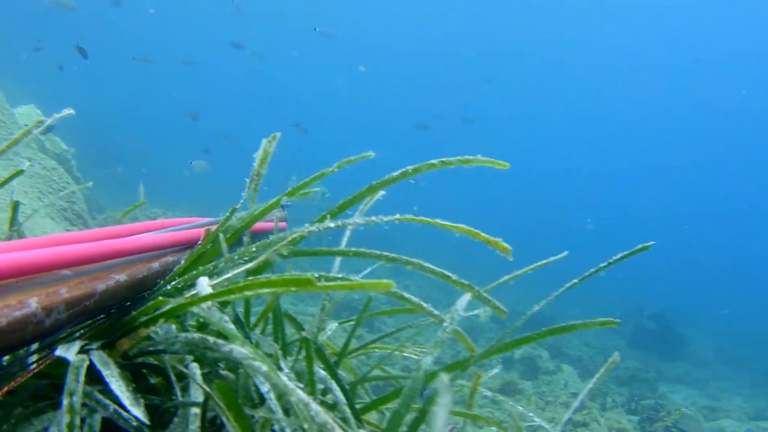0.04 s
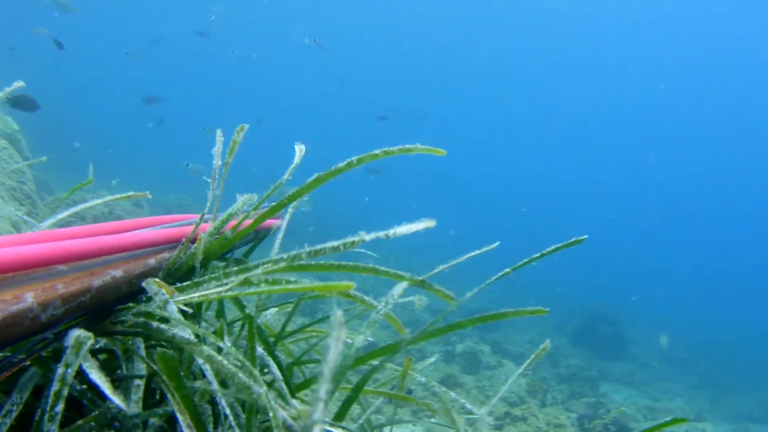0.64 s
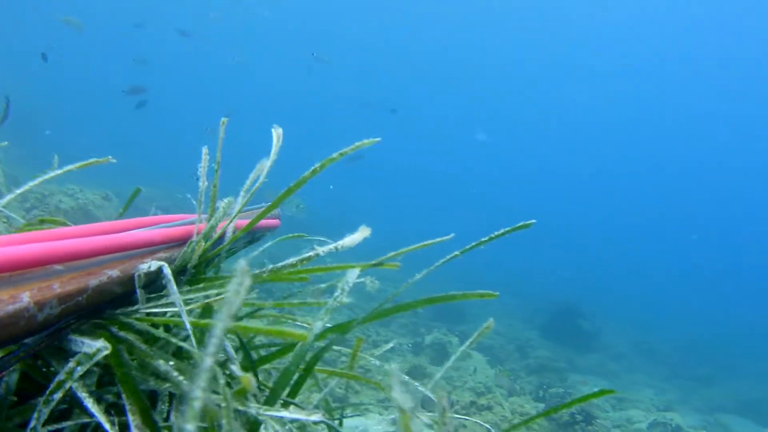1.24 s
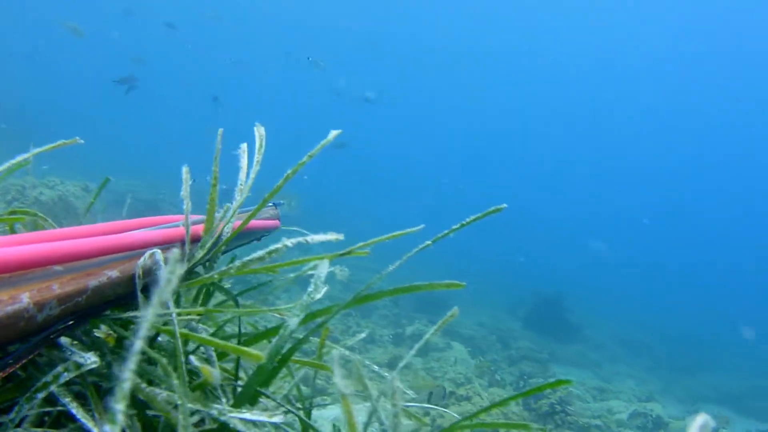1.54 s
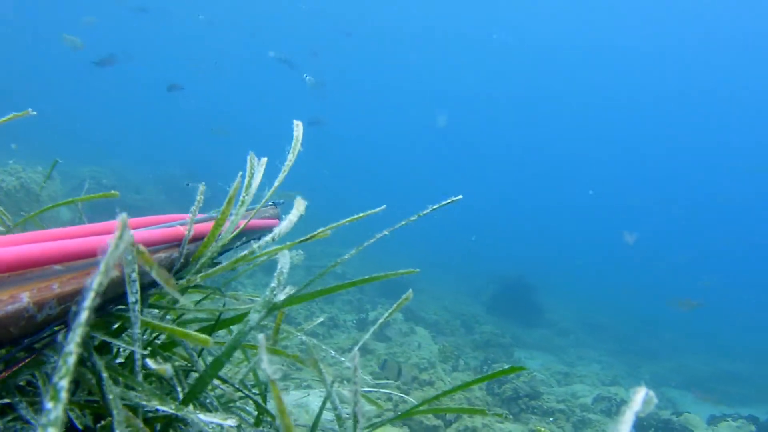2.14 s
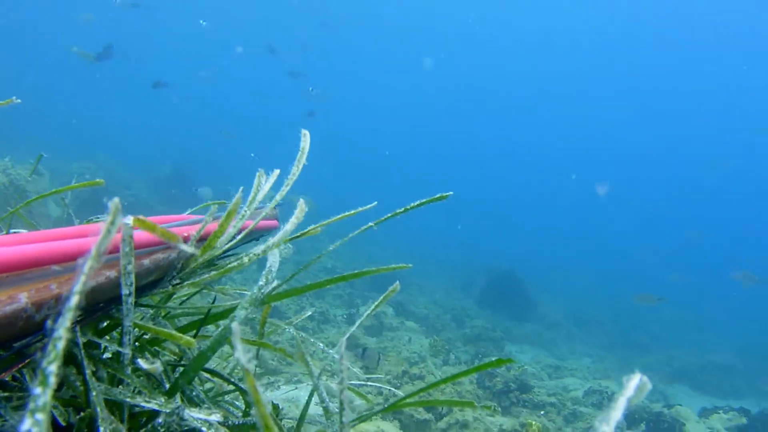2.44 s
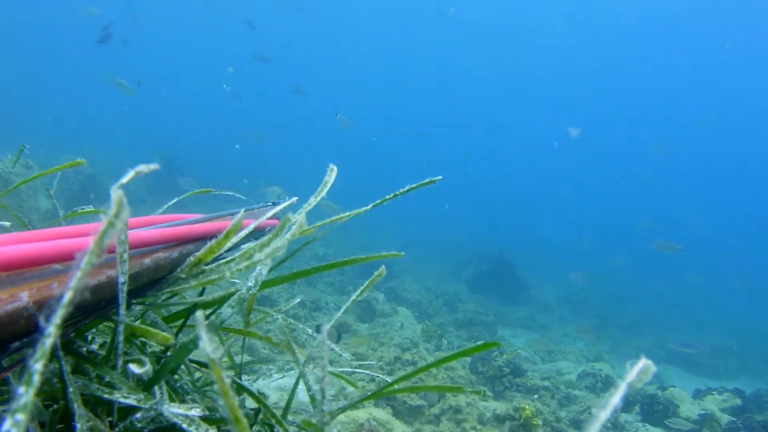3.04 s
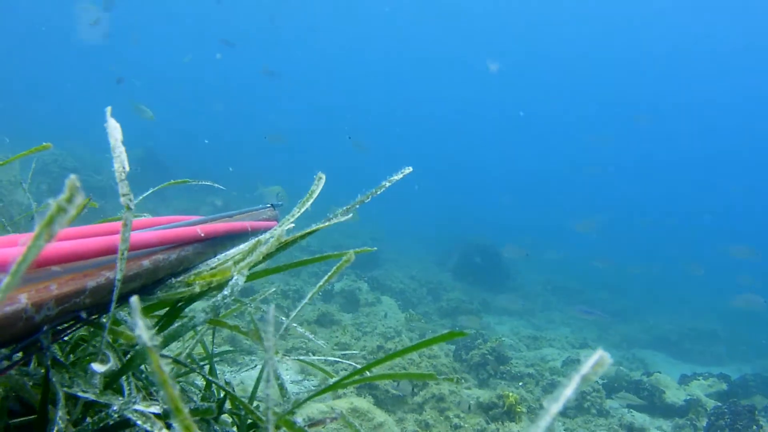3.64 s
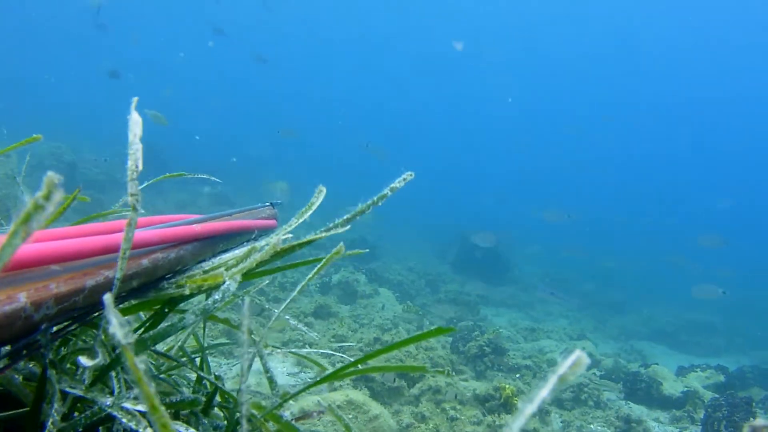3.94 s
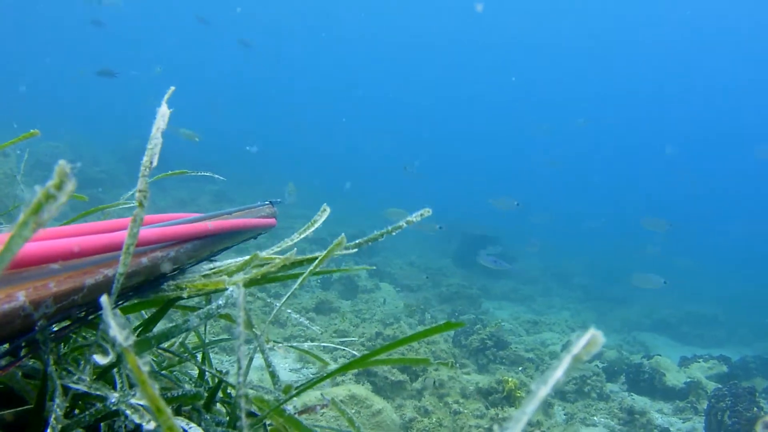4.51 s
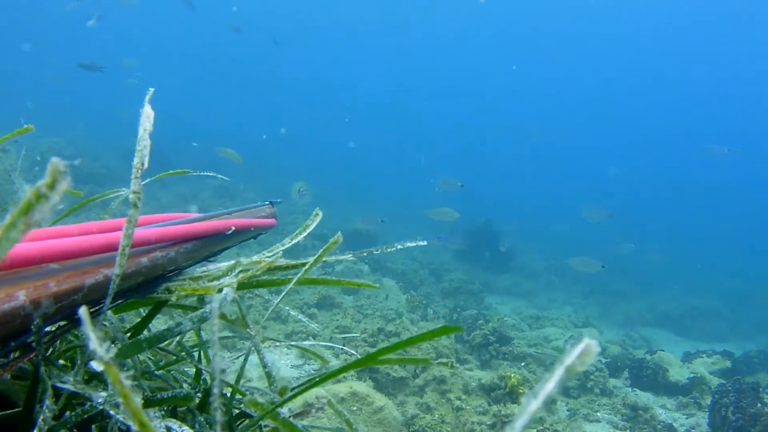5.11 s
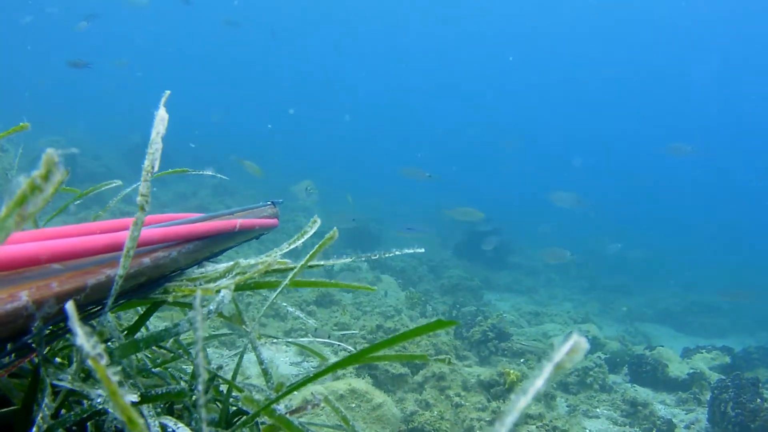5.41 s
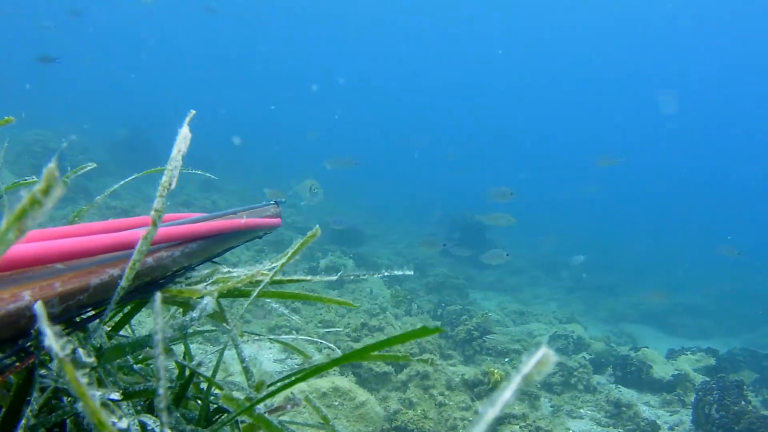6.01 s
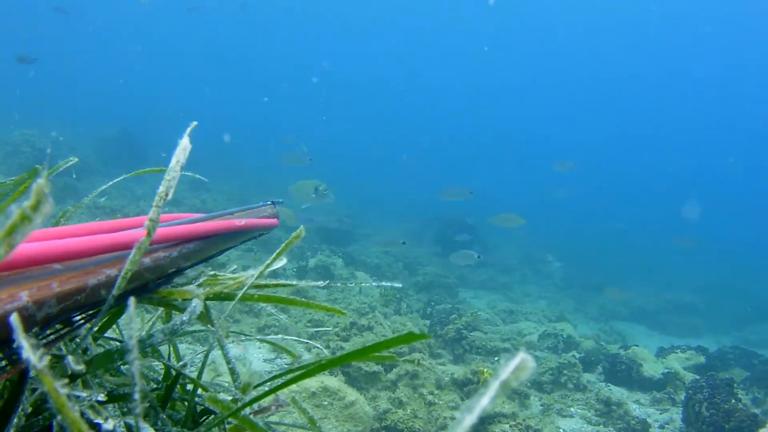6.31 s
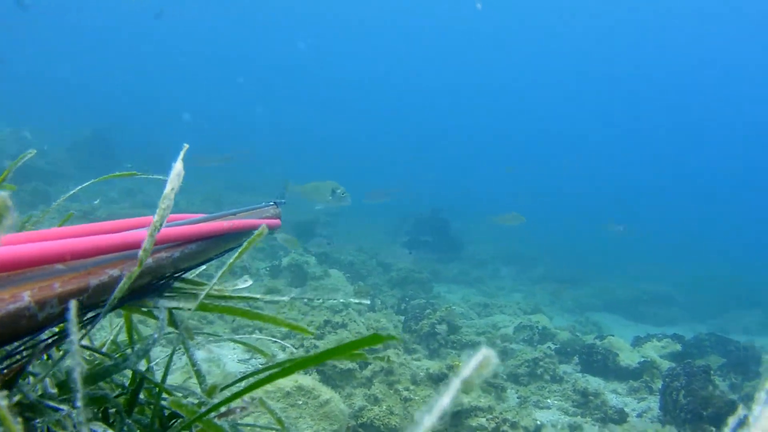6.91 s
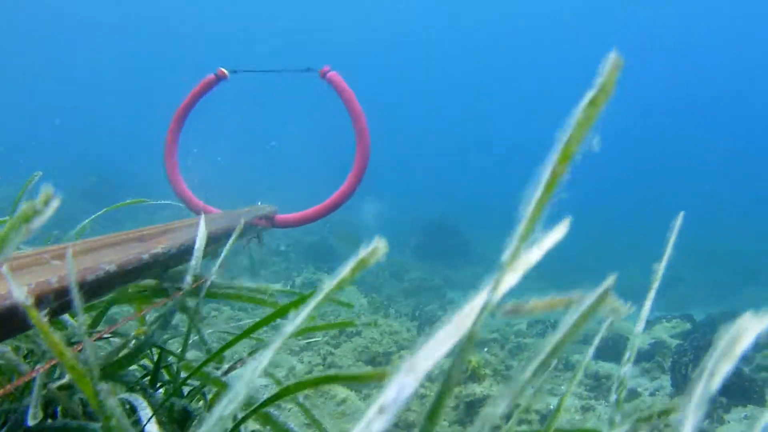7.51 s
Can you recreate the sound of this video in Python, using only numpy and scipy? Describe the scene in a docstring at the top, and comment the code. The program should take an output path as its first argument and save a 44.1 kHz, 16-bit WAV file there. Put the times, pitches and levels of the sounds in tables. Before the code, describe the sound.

From the start, a quiet, dull underwater wash holds steady, with the faint crackle of distant snapping shrimp. Closer shrimp make sharp, dry clicks at irregular intervals, several a second, each ringing slightly in the microphone's sealed housing. Stronger snaps stand out at about 0.2, 2.7, 3.7 and 4.5 seconds.

At about 7.0 seconds, a band-powered speargun fires right beside the microphone. It is by far the loudest sound: a hard, cracking thud with a tight cluster of slaps and knocks, overloading into a brief gritty crackle. A deep surge of churned water comes with the recoil. From about 7.1 seconds there are a few bright ticks and a quickly fading rattle from the bands and shaft. Softer knocks and a light line rattle follow between 7.2 and 7.5 seconds, dying down into the wash and shrimp clicks by about 7.7 seconds.

```python
"""Snapping shrimp click over a low sea wash; at 7 s a speargun fires with a loud, clattering thud.
The gun is band-powered, under water, right beside a microphone in a sealed housing.
Each shrimp snap rings the housing wall. Release and slapping bands ring the gun and overload
the microphone; the recoil shoves water, then wishbone, shaft and line rattle out."""
import sys
import numpy as np
from scipy import signal
from scipy.fft import rfft, irfft, next_fast_len
from scipy.io import wavfile

SR = 44100
rng = np.random.default_rng(int(sys.argv[2]) if len(sys.argv) > 2 else 0)


def store_pcm(level_fs):
    """Save levels as 16-bit WAV."""
    pcm = np.round(np.clip(level_fs, -1, 1) * 32767).astype(np.int16)
    wavfile.write(sys.argv[1], SR, np.atleast_2d(pcm).T)


N = 341775
TIME = np.arange(N) / SR
AGE = np.arange(16384) / SR  # s since an event's onset

# spectrum of a blow on the gun: f/Hz, level/dB
GUN_COLOUR = [(50, -8.5), (120, -7.5), (160, 0), (200, -0.5), (250, 0), (330, -2), (460, 1), (560, 0),
              (690, -1.5), (920, -3.5), (1550, -7.5), (2150, -18), (3100, -18), (3500, -40.5), (15000, -29)]
# gun resonances: f/Hz, level/dB, t60/s
GUN_MODES = [(237, -2.5, 0.095), (434.6, -11, 0.16), (495.5, 0.5, 0.071), (650, -6, .12), (699, -3, 0.062),
             (732, -7, .08), (838, -4.5, 0.1), (914, -8.5, .09), (1185, -12, 0.11), (1303, -17, .09),
             (1520, 0.5, 0.056), (1754, -16, 0.062), (1930, -10, 0.046), (2525, -16, .035),
             (2990, -4, 0.065)]


def undb(db):
    """Decibels to gain."""
    return 10 ** (np.asarray(db) / 20)


def level(x, db):
    """Set the rms level."""
    return x * undb(db) / np.sqrt(np.mean(x ** 2))


def unit(x):
    """Scale to unit energy."""
    return x / np.sqrt(np.sum(x ** 2))


def add(out, t_s, sound):
    """Mix a sound in at t_s."""
    i = int(t_s * SR)
    out[i:i + len(sound)] += sound[:N - i]


def envelope(t_s, db, rise_db_per_s, hold_s, fall_db_per_s):
    """Rise to full level at t_s, hold, die away."""
    before_s = np.maximum(t_s - TIME, 0)
    after_s = np.maximum(TIME - t_s - hold_s, 0)
    return undb(db - rise_db_per_s * before_s - fall_db_per_s * after_s)


def colour(x, points):
    """Minimum-phase filter through (f/Hz, level/dB) points."""
    n = 2 * next_fast_len(len(x))
    hz, db = np.transpose(points)
    bins_hz = np.maximum(np.arange(n // 2 + 1) * SR / n, 1)
    gain = undb(np.interp(np.log(bins_hz), np.log(hz), db))
    cepstrum = irfft(np.log(gain))
    cepstrum[1:n // 2] *= 2
    cepstrum[n // 2 + 1:] = 0
    return irfft(rfft(x, n) * np.exp(rfft(cepstrum)))[:len(x)]


def band(x, low_hz, high_hz):
    """Band-pass with second-order slopes."""
    highpass = signal.butter(2, low_hz, "high", fs=SR, output="sos")
    lowpass = signal.butter(2, high_hz, "low", fs=SR, output="sos")
    return signal.sosfilt(np.vstack([highpass, lowpass]), x)


def ring(force, modes):
    """A force rings damped modes."""
    response = sum(undb(db - 60 * AGE / t60_s) * np.cos(2 * np.pi * hz * AGE) for hz, db, t60_s in modes)
    return signal.fftconvolve(force, response)[:len(force)]


def burst(window):
    """Windowed random force, unit energy."""
    return unit(rng.standard_normal(len(window)) * window)


def crack(length_s):
    """Brief contact: a random force, spectrally flattened."""
    window = np.exp(-(AGE / length_s) ** 4)
    spectrum = rfft(burst(window))
    flat = irfft(spectrum / (np.abs(spectrum) + 1e-12))
    return unit(flat * np.sqrt(window))


def clicks(per_s, spread_db):
    """Random impulses: many weak, a few strong."""
    size = undb(spread_db * np.minimum(rng.exponential(size=N), 5))
    return (rng.random(N) < per_s / SR) * size * rng.choice([-1, 1], N)


def sea(db=-54, swell_db=.5):
    """Dull, even wash that swells very slightly."""
    # wash spectrum: f/Hz, level/dB
    wash_colour = [(12, -42), (20, -4), (95, -2), (365, -3), (482, -5), (819, -8.5), (916, -10),
                   (1280, -16), (1510, -16.5), (2180, -22.5), (3220, -26), (4140, -31.5), (4630, -27),
                   (5470, -32), (15800, -38.5)]
    steps_s = np.arange(0, 8, .25)
    swell = np.interp(TIME, steps_s, rng.standard_normal(len(steps_s)))
    return level(colour(rng.standard_normal(N), wash_colour), db) * undb(swell_db * swell)


def far_shrimp(db=-73, smear_s=.005):
    """The distant colony: faint, smeared crackle."""
    # crackle spectrum: f/Hz, level/dB
    crackle_colour = [(1000, -21), (1600, 7), (4600, 0), (8000, -8), (15000, -17)]
    pops = clicks(per_s=120, spread_db=2.6)
    crackle = signal.fftconvolve(pops, burst(np.exp(-AGE / smear_s)))[:N]
    return level(colour(crackle, crackle_colour), db)


def snap(db, brightness_db, hollow_hz, hollow_db=-3):
    """A click through water: crack, bounce, shiver of the housing wall, scatter off the seabed."""
    # snap through the wall: f/Hz, level/dB
    body_colour = [(900, -26), (1400, -4.5), (1900, 7.5), (2400, 7), (3200, 6), (3900, -1.5), (4650, 7),
                   (5700, -6.5), (6500, 4), (7300, -24), (12000, -36)]
    # its treble fizz: f/Hz, level/dB
    fizz_colour = [(4000, -37), (6500, 1), (8300, 15.5), (10000, 9), (13000, 8), (16000, -17)]
    # housing resonances: f/Hz, level/dB, t60/s
    housing_modes = [(1490, 1.5, 0.049), (1520, 5, 0.021), (1770, -1, 0.038)]
    crack_s, max_lag_s, shiver_s, seabed_s, hollow_t60_s = .0013, .003, .0033, .012, .0045
    direct = crack(crack_s)
    bounce = np.roll(direct, int(max_lag_s * rng.uniform(.5, 1) * SR))
    onset = 1 - np.exp(-AGE / crack_s)
    tail = burst(onset * (np.exp(-AGE / shiver_s) + undb(-15) * np.exp(-AGE / seabed_s)))
    late = undb(-5) * bounce + undb(-2.5) * tail
    force = direct + late
    body = unit(colour(force, body_colour))
    # each direction of arrival favours another broad wall resonance
    hollow = undb(hollow_db) * unit(ring(body, [(hollow_hz, 0, hollow_t60_s)]))
    # brighter: more fizz, less housing ring
    fizz = undb(-15 + .55 * brightness_db) * unit(colour(direct + .5 * late, fizz_colour))
    drive = band(force, low_hz=1300, high_hz=3870)
    housing = undb(-3 - brightness_db) * unit(ring(drive, housing_modes))
    return (unit(body + hollow) + fizz + housing) * undb(db) * np.sqrt(crack_s * SR)


def weak_snaps(count=55):
    """Shrimp at middle distance, random in time, strength and colour."""
    out = np.zeros(N)
    times_s = rng.uniform(0, TIME[-1], count)
    for t_s, (size, bright, pitch) in zip(times_s, rng.standard_normal((count, 3))):
        click = snap(db=-58.5 + 2 * size, brightness_db=5 + 6 * bright, hollow_hz=3200 * 2 ** (pitch / 2))
        add(out, t_s, click)
    return out


def near_snaps():
    """Sharp clicks close by: shrimp, then ticks of the departing shaft."""
    # clicks: t/s, level/dB, brightness/dB, hollow f/Hz, hollow level/dB
    events = [(.0709, -41.5, -6.5, 4550, -14), (.2056, -34.5, 3, 3100, -2), (.3519, -42.5, -8, 1950, 6),
              (.5767, -56, -12, 3240, 2), (.6033, -47.5, 7, 3160, -10), (.6286, -52, 14, 3360, -6),
              (.6538, -48, 13, 4640, -6), (.8098, -50, 8, 2310, -15), (1.0719, -43.5, 7, 5400, -2),
              (1.1018, -48, -2, 3250, -13), (1.2976, -49, -8, 2330, -6), (1.3782, -47, -14.5, 4400, -5),
              (1.4216, -52, 5, 5220, 11), (1.4806, -44, -1, 2430, -16), (1.5176, -50, 6, 4640, 0),
              (2.1994, -49.5, 6, 4580, -15), (2.2596, -50.5, -3, 2410, -12), (2.2993, -46, 9, 4700, -8),
              (2.354, -40.5, -4, 2320, 8), (2.366, -49, 4, 4600, -8), (2.5976, -47, 2, 2800, 10),
              (2.7142, -33.5, -1.5, 3000, -12), (2.7759, -44.5, 3, 5330, 5), (3.1, -46, -3, 2470, -2),
              (3.1567, -43, 5, 3300, -8), (3.4532, -48.5, -4, 2330, -4), (3.7076, -34, 0, 3400, -8),
              (3.9106, -38, -5, 2220, 20), (4.2928, -49, -6, 4450, -15), (4.4838, -49.5, -4, 4800, -2),
              (4.5041, -35, 0, 2500, 6), (4.7843, -41, 15, 5400, 6), (4.9792, -46.5, 1, 3030, -10),
              (5.0498, -46, 1, 2410, 4), (5.1774, -45, 10, 2470, -20), (5.3824, -39.5, -6, 2350, 1),
              (5.4064, -45, 16, 4620, -2), (6.0604, -47.5, 0, 3040, -10), (6.0886, -45, 0, 2450, -11),
              (6.1597, -44.5, 11, 2470, -25), (6.3056, -47, -6, 2320, 6), (6.8419, -49, 1, 2460, -18),
              (6.9124, -48.5, 2, 5400, -10), (7.0485, -25, 14, 4700, -6), (7.1212, -19, 10, 4700, -6),
              (7.1488, -29, 8, 5200, 0), (7.3188, -42.5, -6, 2210, -5), (7.3381, -42.5, -1, 2540, -7),
              (7.4124, -51, -14, 2270, 7), (7.4885, -51, -2, 5000, -12), (7.606, -40, -5, 2350, -3),
              (7.613, -46, -10, 2020, -7)]
    out = np.zeros(N)
    for t_s, *click in events:
        add(out, t_s, snap(*click))
    return out


def overload_crackle():
    """Bright, gritty crackle of the overloaded microphone during the shot, as dense random clicks."""
    # grit spectrum: f/Hz, level/dB
    grit_colour = [(900, -20), (1800, 0), (5500, 0), (9000, -9), (15000, -20)]
    grit = level(colour(clicks(per_s=700, spread_db=1.8), grit_colour), 0)
    return grit * envelope(t_s=7.064, db=-37, rise_db_per_s=2500, hold_s=.022, fall_db_per_s=250)


def recoil():
    """The kick churns water: eddies round the housing and slow pressure swings, suction first."""
    # churning spectrum: f/Hz, level/dB
    swirl_colour = [(15, -5.5), (30, -3), (55, -4), (90, -11), (200, -15.5), (500, -31), (1500, -59),
                    (8000, -120)]
    # eddies at the housing, some ahead of the shot: t/s, level/dB, rise/(dB/s), fall/(dB/s)
    eddies = [(.745, -48, 650, 400), (1.33, -49.5, 550, 480), (6.82, -55, 100, 22), (7.34, -37, 330, 250),
              (7.52, -47, 130, 160)]
    # water shoved by stock and bands: t/s, f/Hz, level/dB, length/s
    surges = [(7.0273, 50.8, -1.5, 0.021), (7.062, 155.3, -8.5, 0.088), (7.08, 101, -12, .04),
              (7.085, 49, -13, .045), (7.18, 48.5, -29, .06)]
    flow = envelope(t_s=7.08, db=-24, rise_db_per_s=360, hold_s=.07, fall_db_per_s=115)
    flow += sum(envelope(t_s, db, rise, 0, fall) for t_s, db, rise, fall in eddies)
    out = level(colour(rng.standard_normal(N), swirl_colour), 0) * flow
    for t_s, hz, db, length_s in surges:
        window = np.exp(-(AGE / length_s) ** 8)
        add(out, t_s, -undb(db) * np.sin(2 * np.pi * hz * AGE) * window)
    return out


def rattle(low_hz, high_hz, ring_db):
    """Dense small contacts ringing the gun, unit rms."""
    ticks = colour(band(clicks(per_s=1500, spread_db=.5), low_hz, high_hz), GUN_COLOUR)
    return level(level(ticks, 0) + level(ring(ticks, GUN_MODES), ring_db), 0)


def running_gear(line_taut_s=7.2):
    """Slack bands thrash the stock, the shaft scrapes along its track, the line follows."""
    bands = rattle(low_hz=145, high_hz=1050, ring_db=-12)
    bands *= envelope(t_s=7.073, db=1, rise_db_per_s=2200, hold_s=.012, fall_db_per_s=380)
    shaft = rattle(low_hz=350, high_hz=1550, ring_db=-3)
    shaft *= envelope(t_s=7.06, db=-26, rise_db_per_s=480, hold_s=.095, fall_db_per_s=170)
    line = rattle(low_hz=450, high_hz=1500, ring_db=-2.5) * (TIME > line_taut_s)
    line *= envelope(t_s=7.51, db=-40.5, rise_db_per_s=38, hold_s=.025, fall_db_per_s=170)
    return bands + shaft + line


def knocks():
    """Hard blows: each a brief grinding contact, after which the gun rings on."""
    # trigger, release, shaft, wishbone: t/s, level/dB, contact/s, low f/Hz, high f/Hz, ring/dB
    blows = [(6.968, -51.5, .0073, 450, 1390, -11), (7.0165, -35.5, .012, 400, 1490, -6),
             (7.024, 15.5, .0062, 453, 880, -40), (7.0287, 12, .0007, 1500, 5000, -40),
             (7.0482, -15, .0024, 700, 4500, -33), (7.0579, -18, .0015, 500, 4000, -14),
             (7.0612, 1, .0074, 510, 2500, -11), (7.0812, 10, .0034, 130, 1600, -19),
             (7.087, 5, .006, 200, 1300, -14), (7.1205, -3.5, .0035, 404, 3500, -14),
             (7.135, -10, .0058, 120, 1590, -10), (7.149, -18.5, .0058, 150, 1400, -23),
             (7.1835, -32, .0054, 400, 2300, -10), (7.212, -25, .007, 520, 2400, -4),
             (7.295, -25.5, .0054, 170, 3300, -6.5), (7.321, -38, .007, 600, 1800, 7),
             (7.3388, -28.5, .0064, 650, 850, 8), (7.3475, -34, .0047, 700, 1500, 5),
             (7.354, -26, .006, 670, 940, -9), (7.376, -36.5, .01, 450, 1380, -13),
             (7.519, -38, .016, 650, 1700, -6)]
    out = np.zeros(N)
    for t_s, db, contact_s, low_hz, high_hz, ring_db in blows:
        thud = unit(colour(band(crack(contact_s), low_hz, high_hz), GUN_COLOUR))
        blow = thud + undb(ring_db) * unit(ring(thud, GUN_MODES))
        add(out, t_s, blow * undb(db) * np.sqrt(contact_s * SR))
    return out


def scene():
    """The shot amid sea and shrimp, mono."""
    background = sea() + far_shrimp()
    shot = knocks() + recoil() + running_gear() + overload_crackle()
    return (background + shot + near_snaps() + weak_snaps())[None]


def record(dry, ceiling=.325, top_hz=16100):
    """The microphone saturates on the shot, squaring its waves; the top is cut."""
    drive = signal.resample_poly(dry, 2, 1, axis=1) / ceiling  # 2x oversampled
    clipped = ceiling * drive / (1 + drive ** 6) ** (1 / 6)
    lowpass = signal.ellip(8, .2, 70, top_hz, fs=SR, output="sos")
    return signal.sosfilt(lowpass, signal.resample_poly(clipped, 1, 2, axis=1))


dry = scene()
out = record(dry)
store_pcm(out)
```